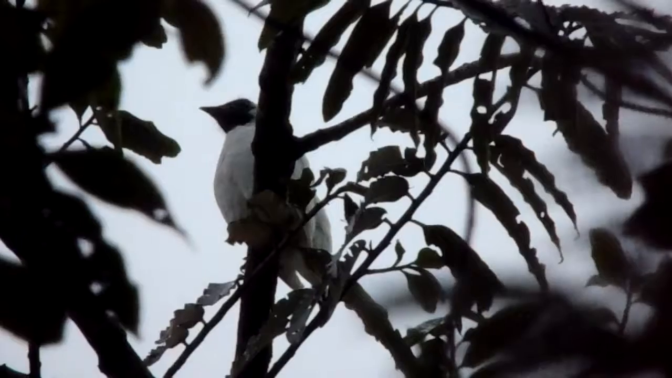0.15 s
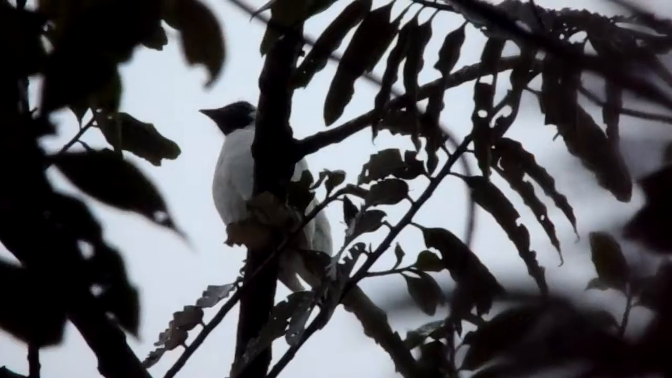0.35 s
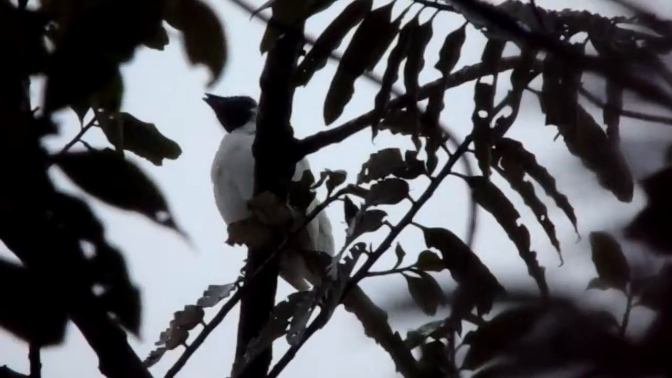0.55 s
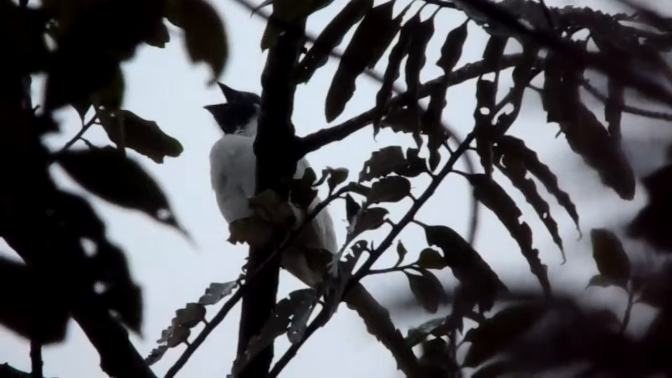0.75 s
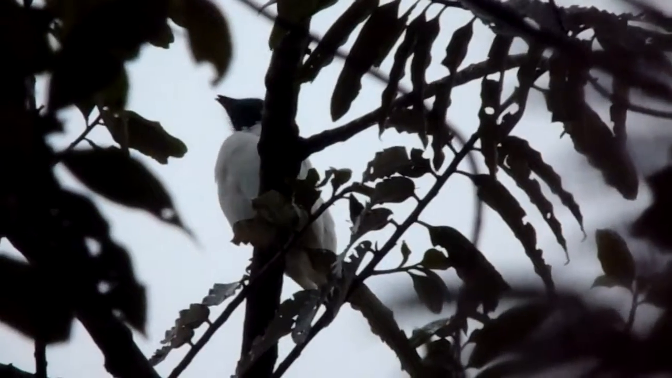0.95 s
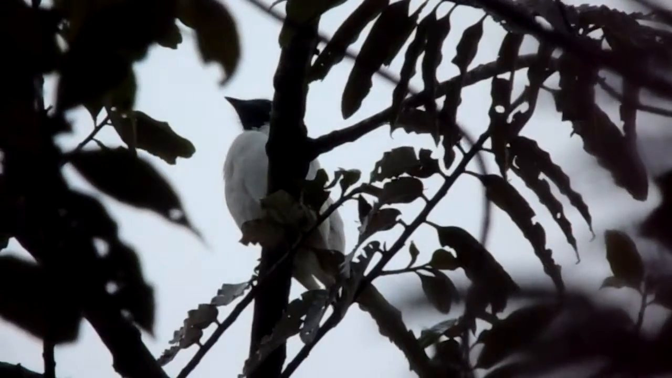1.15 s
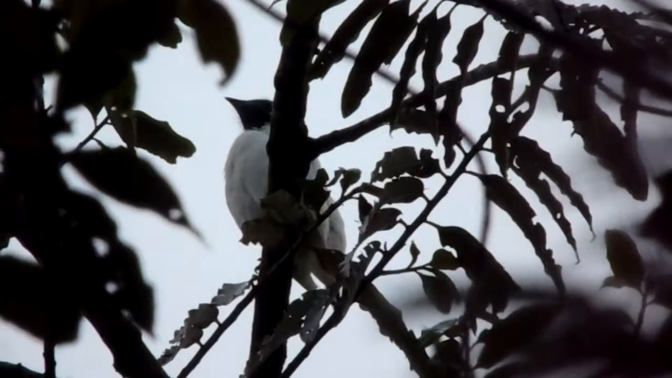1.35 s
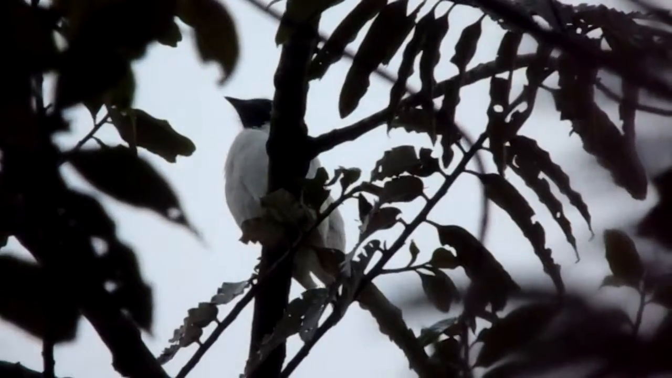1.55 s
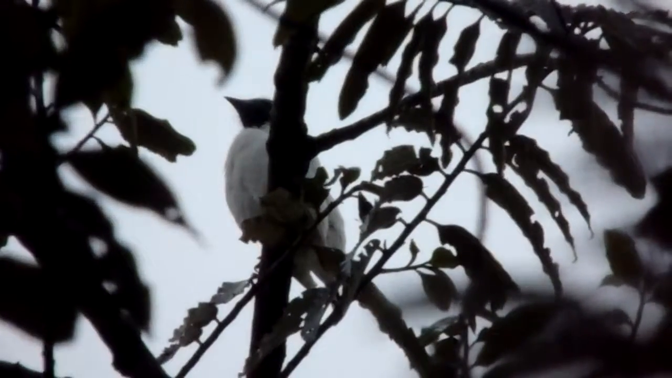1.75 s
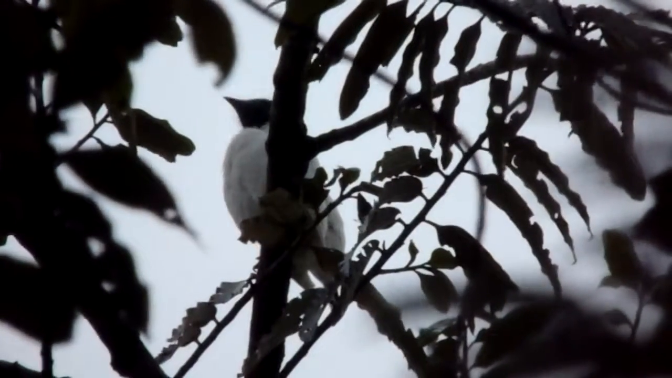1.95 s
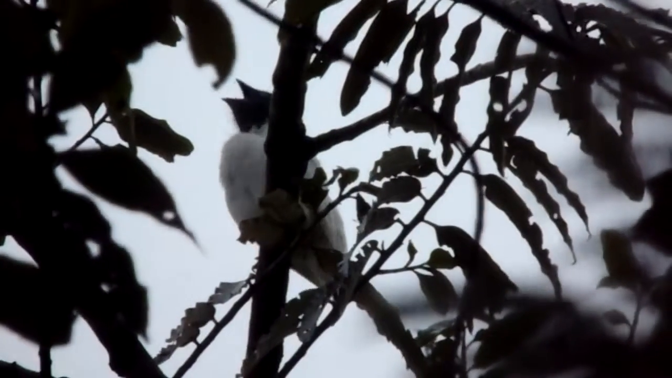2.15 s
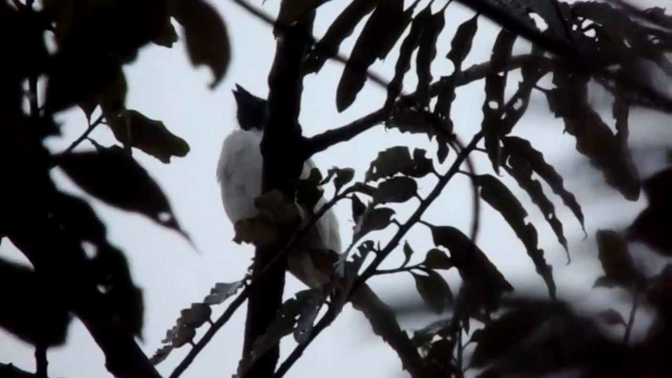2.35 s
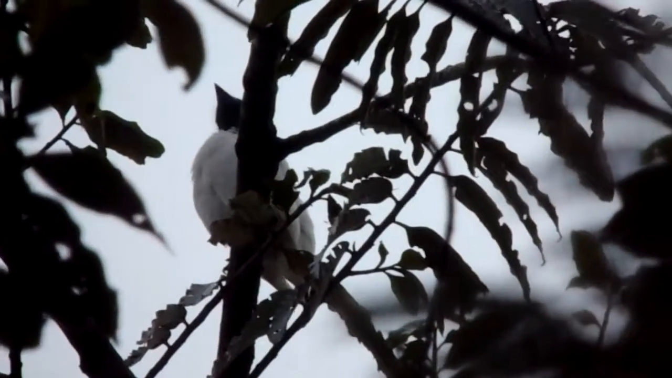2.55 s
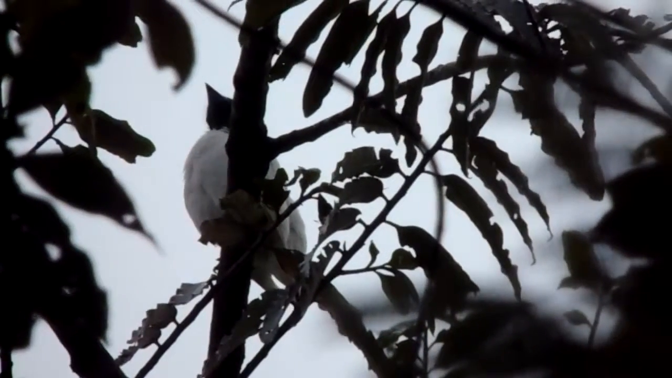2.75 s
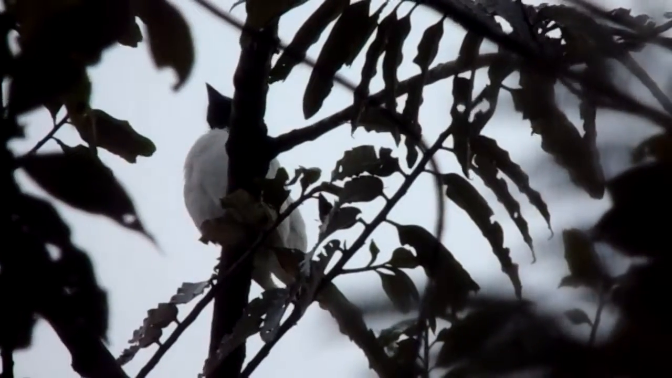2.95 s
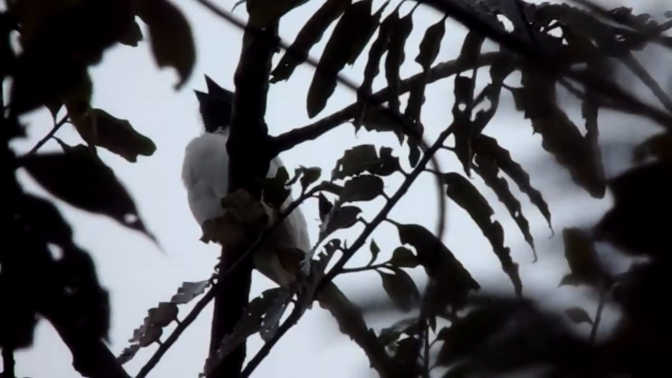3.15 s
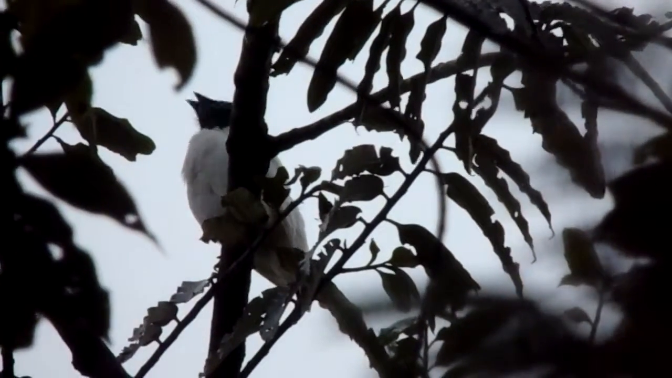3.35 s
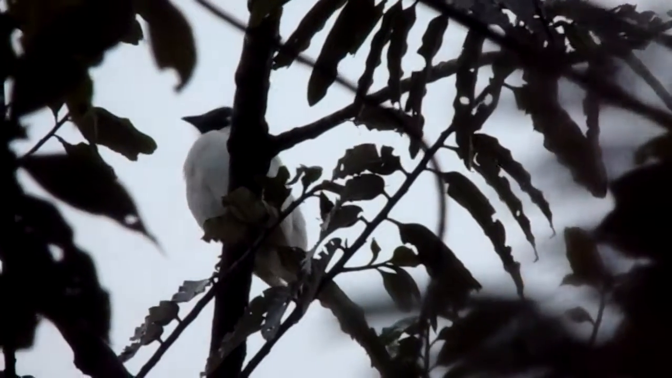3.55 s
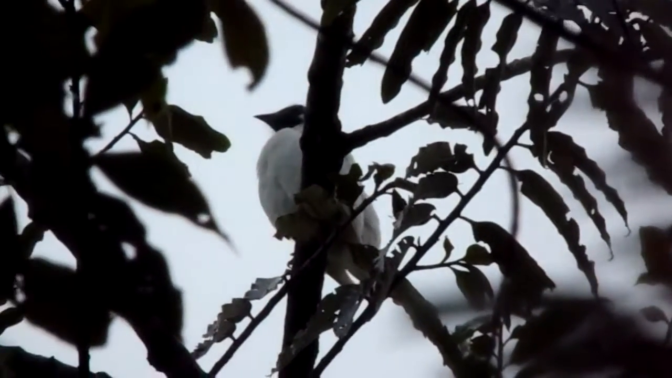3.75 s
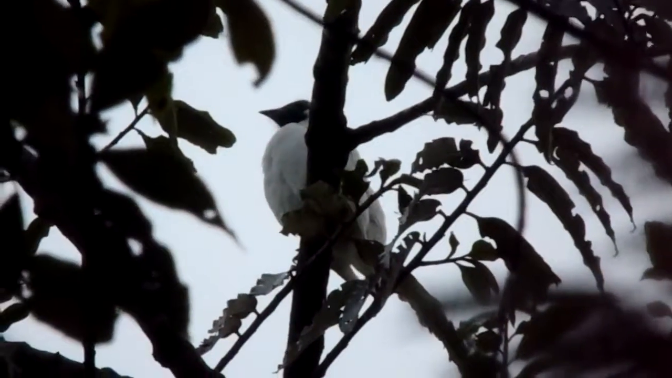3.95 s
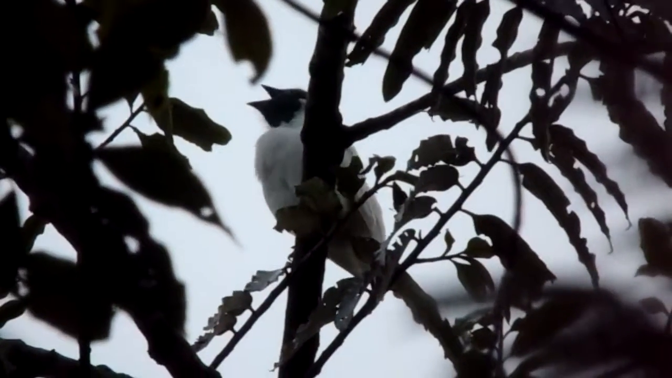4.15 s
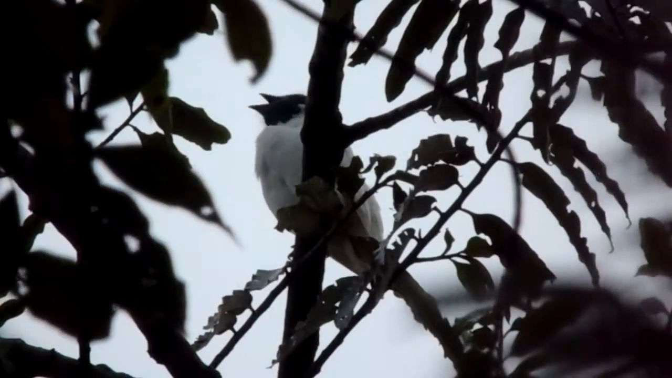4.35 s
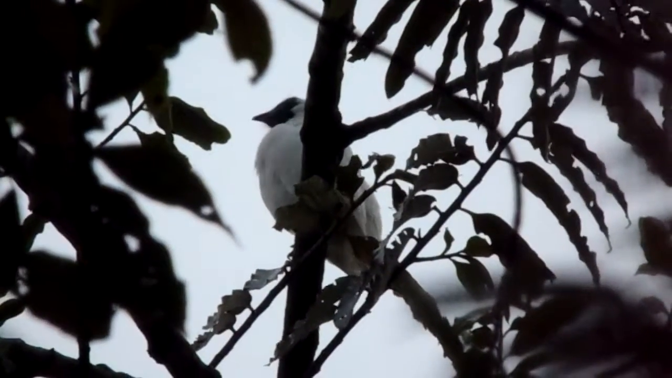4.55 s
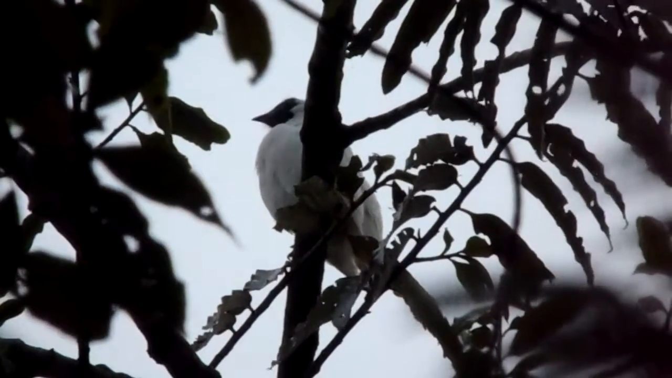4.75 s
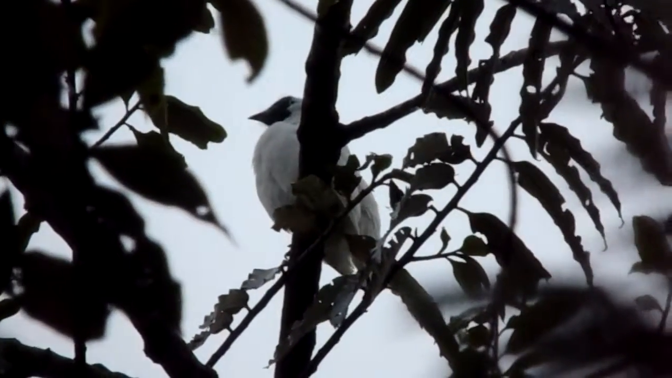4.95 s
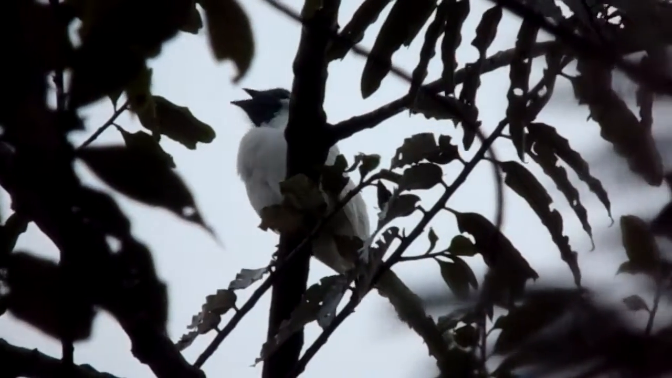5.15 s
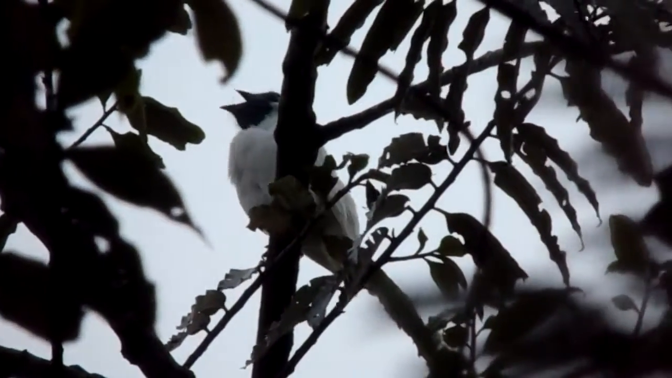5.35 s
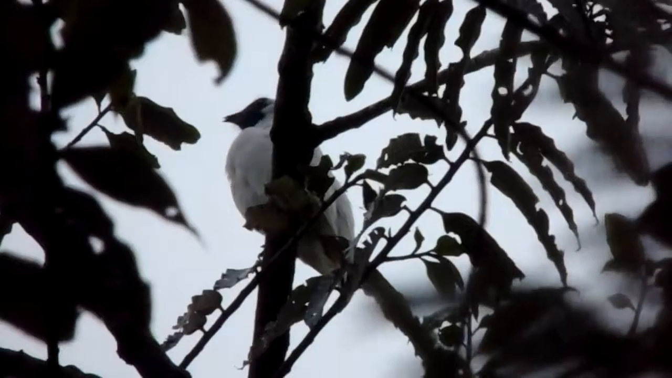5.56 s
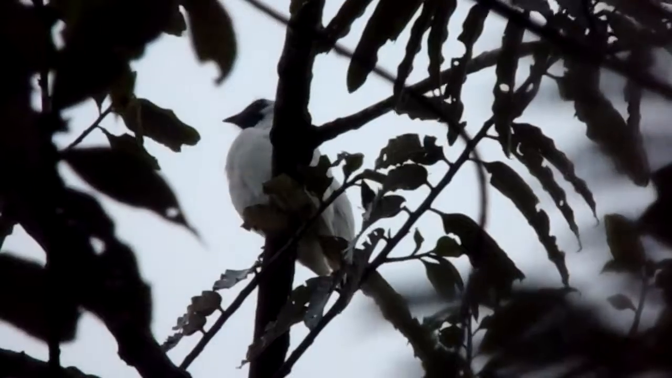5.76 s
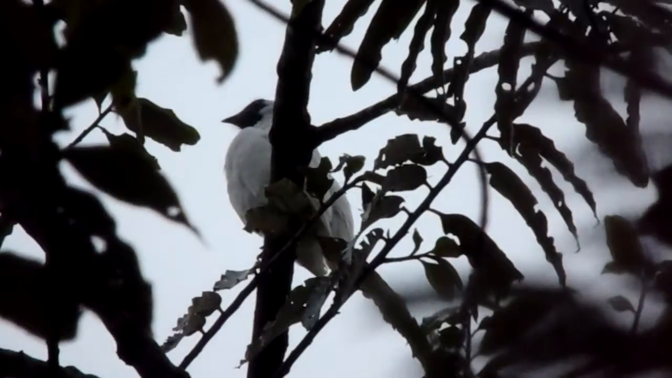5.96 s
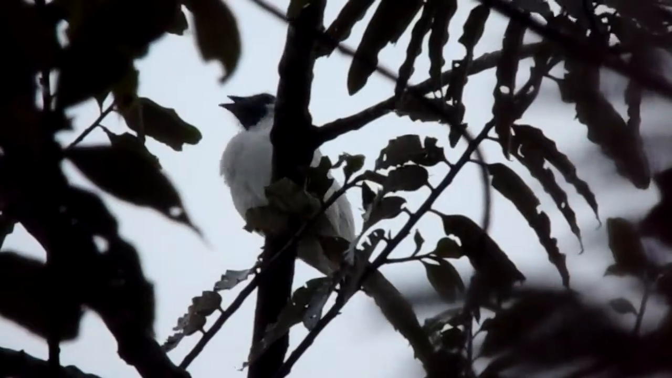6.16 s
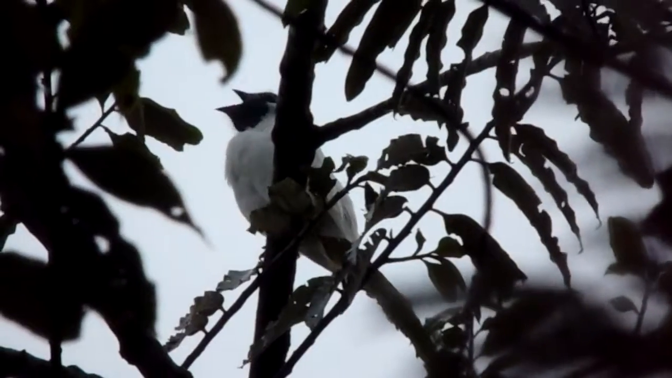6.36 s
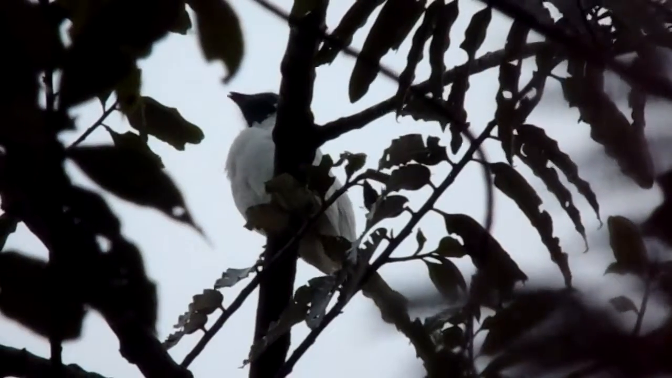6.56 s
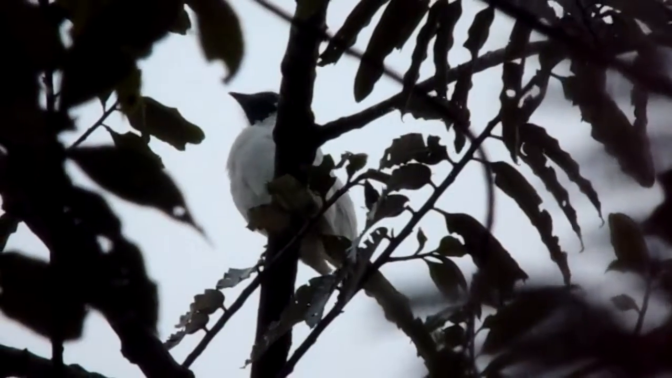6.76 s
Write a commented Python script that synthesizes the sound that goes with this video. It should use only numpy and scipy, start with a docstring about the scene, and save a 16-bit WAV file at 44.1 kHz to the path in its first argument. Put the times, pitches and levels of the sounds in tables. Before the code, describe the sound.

In a quiet, reverberant forest, a bellbird gives six short, piercing metallic clangs, the first much the loudest, after which they come about every second. Each throbs roughly for an instant, then leaves a thin high whistle and an echo from the trees. Very faint behind are insect hum, thin falling chirps, hoarse little scolds, a soft wing flutter and drops tapping leaves, one clicking close to the microphone.

```python
"""Bellbird in a forest

Six loud, throbbing clangs are modulated tones with a throat rasp; a thin whistle with harmonics follows each.
Small birds slur, glide and rasp as swept tones; wings flutter as pulsed noise.
Insects hum as trains of pips over filtered noise; drops tap as decaying noise and ringing modes.
A hush of filtered noise lies beneath; decaying noise responses give the echo of trunks and canopy."""
import sys
import numpy as np
from scipy import signal
from scipy.fft import rfft, irfft, next_fast_len
from scipy.io import wavfile
from scipy.ndimage import uniform_filter1d

SR = 44100
rng = np.random.default_rng(int(sys.argv[2]) if len(sys.argv) > 2 else 0)


def put_to_file(sound):
    """Save the sound as 16-bit audio at rate SR, in the file named by the first command-line argument."""
    columns = np.atleast_2d(sound).T  # one column per channel
    safe = np.clip(columns, -1, 1)
    whole_steps = np.round(safe * 32767)
    wavfile.write(sys.argv[1], SR, whole_steps.astype(np.int16))


N = 300321
T = np.arange(N) / SR  # time/s

# Spectrum of the forest hush: f/Hz, relative level/dB
HUSH_SPECTRUM = [(12, -32), (20, -1.5), (63, 0.5), (119, -2), (156, -3.5), (270, -3), (494, -5.5),
                 (766, -5), (1560, -10), (1740, -11), (4810, -18), (5990, -14), (7060, -16), (11900, -20.5),
                 (14000, -22.5)]
# Near insects: pip rate/Hz, f/Hz, level/dB
INSECTS = [(38.7, 5700, -68), (42.8, 6150, -69.5)]
# Spectrum of the far insect chorus: f/Hz, relative level/dB
CHORUS_SPECTRUM = [(4500, -37), (5300, -11.5), (5750, 1.5), (6000, -2), (6350, -2.5), (6700, -12.5),
                   (7500, -32.5)]
# Drops on leaves: t/s, level/dB
LEAF_TAPS = [(0.0834, -45.5), (0.5938, -41), (1.548, -35.5), (4.7989, -38.5)]
# Spectrum of a struck leaf: f/Hz, relative level/dB
LEAF_SPECTRUM = [(120, -20), (300, -2), (700, 6), (1500, 2.5), (2800, -2), (4500, -20.5), (9000, -19),
                 (14000, -26)]
# Modes of one drop striking close to the microphone: f/Hz, level/dB, t60/s
CLOSE_DROP_MODES = [(267, -36, 0.061), (538, -42.5, 0.063), (804, -35, 0.066), (930, -37.5, 0.047),
                    (1020, -37, 0.061), (1820, -31, 0.012), (2900, -30, 0.017), (5120, -26.5, 0.0095),
                    (10160, -34, 0.0064), (12100, -43, .007)]
CLOSE_DROP_S = 5.6062
# Thin, high slurs of a small bird: t/s, length/s, start f/Hz, level/dB
THIN_SLURS = [(0.321, 0.45, 10490, -56), (0.756, .49, 10520, -49), (1.12, .44, 10300, -67),
              (2.797, 0.5, 10560, -49.5), (2.903, .53, 10540, -53.5), (4.98, 0.36, 10320, -53.5),
              (5.159, 0.44, 10370, -53.5), (6.538, 0.4, 10450, -52)]
SLUR_FALL_HZ_PER_S = 2700
# Harsh calls of another bird: t/s, length/s, level/dB
SCOLDS = [(0.653, 0.23, -50), (2.026, 0.21, -50), (3.225, 0.2, -50.5), (4.386, 0.22, -50.5),
          (5.702, 0.2, -50), (6.772, 0.14, -53.5)]
# Spectrum of their hiss: f/Hz, relative level/dB
SCOLD_HISS_SPECTRUM = [(1800, -25), (3000, -5.5), (4300, -8), (5400, -4.5), (7600, -3.5), (9500, -15.5),
                       (12500, -10.5), (15000, -17.5)]
# Bellbird clangs: middle t/s, f/Hz, level/dB, half length/s, throb strength/dB,
# rasp level re the tone/dB, forest scatter level/dB
CLANGS = [(0.864, 1519, -13.5, 0.033, -1, -21.5, -21.5), (2.354, 1529, -22, .032, 1, -23.5, -20.5),
          (3.358, 1522, -21, .032, -1, -23, -22), (4.376, 1529, -22, .031, 1, -24, -20.5),
          (5.4074, 1526, -22.5, 0.033, -0.5, -24.5, -18.5), (6.432, 1527, -23, 0.031, 0, -24.5, -17)]
# Side tones made by the throb: offset from the pitch in multiples of the throb rate
SIDE_ORDERS = [-2, -1, 1, 2]
# Their levels before each clang's throb strength is added: level/dB
SIDE_LEVELS = [-26.5, -12, -14.5, -33]
# Resonances of throat and open bill: f/Hz, nominal width/Hz, relative level/dB
THROAT_RESONANCES = [(2733, 169, 3), (3103, 71, 6), (4186, 230, 1), (5050, 87, -14.5), (5410, 520, -14),
                     (6450, 290, -12), (7380, 770, -14)]
THROB_HZ, THROB_BEND_HZ = 78.57, 8.1  # the pitch dips at each throb
OCTAVE_DB, OCTAVE_FADE_S = -23, 0.04  # the octave sounds in the first throbs
FAR_ECHO_S, FAR_ECHO_DB = 0.245, -28.5  # one clear echo from the far trees
# Whistles after the clangs: loudest t/s, f/Hz, level/dB, first dip t/s, dip depth/dB
RINGS = [(0.958, 3150, -33, 0.995, 15), (2.464, 3166, -39.5, 2.535, 11), (3.456, 3150, -39, 3.493, 10),
         (4.488, 3160, -42, 4.53, 4.5), (5.528, 3163, -42.5, 5.615, 25), (6.541, 3157, -42, 6.61, 0)]
RING_RISE_DB_PER_S, RING_FADE_DB_PER_S = 270, 72
# This long after its peak the whistle is let go: the release rate adds to the fade
RING_HOLD_S, RING_RELEASE_DB_PER_S = 0.22, 138.5
DIP_EVERY_S, DIP_WIDTH_S = 0.145, 0.021
# Bursts of wingbeats: t/s, length/s, level/dB
FLUTTERS = [(1.681, 0.17, -55.5), (1.912, .41, -57), (2.322, 0.071, -51.5)]
# Spectrum of a wingbeat: f/Hz, relative level/dB
WINGBEAT_SPECTRUM = [(150, -21), (330, -15), (420, 4), (500, -12), (580, -0.5), (646, 4), (700, -18),
                     (775, 6.5), (900, -20), (1250, -4.5), (1800, -21), (2270, -12.5), (4000, -35)]
WING_HZ = 29.87
# Gliding whistles of a farther songbird: t/s, length/s, start f/Hz, end f/Hz, level/dB
GLIDES = [(2.857, 0.13, 3530, 2460, -58.5), (2.97, 0.21, 2605, 2610, -59.5), (3.392, .22, 2975, 1955, -57),
          (3.593, .2, 2760, 2670, -62.5), (3.886, 0.11, 4030, 2460, -61), (3.987, .26, 2790, 2890, -63.5),
          (4.158, .14, 2590, 1960, -55.5), (4.258, 0.068, 7100, 7240, -57.5),
          (4.611, .19, 2970, 2370, -60.5), (4.828, 0.32, 2850, 2970, -65.5),
          (5.925, 0.15, 2910, 2940, -67.5)]
TOP_HZ = 14150  # upper edge of the passband


def undb(db):
    """Level law: convert decibels to an amplitude ratio."""
    return 10 ** (np.asarray(db) / 20)


def unit(x):
    """Normalization: scale a signal to an rms value of 1."""
    return x / np.sqrt(np.mean(x ** 2))


def shape(x, gain):
    """Linear filtering: multiply the spectrum by a gain given as a function of frequency."""
    size = next_fast_len(N + SR // 4)
    hz = np.arange(size // 2 + 1) * SR / size + 1e-6  # the offset avoids log(0) and division by 0
    return irfft(rfft(x, size) * gain(hz), size)[:N]


def noise(points):
    """Spectral shaping: white noise takes a colour interpolated over log frequency, at rms 1."""
    hz, db = np.transpose(points)

    def gain(f):
        """Interpolation: read the gain between the listed frequencies."""
        return undb(np.interp(np.log(f), np.log(hz), db))

    return unit(shape(rng.standard_normal(N), gain))


def walk(rate):
    """Random modulation: smoothed random steps at the given rate/Hz wander with rms near 1."""
    step = max(int(SR / rate), 1)
    held = np.repeat(rng.standard_normal(N // step + 1), step)
    return unit(uniform_filter1d(held, step)[:N])


def phase(hz):
    """Frequency modulation: phase is the running integral of frequency."""
    return 2 * np.pi * np.cumsum(hz) / SR


def arch(u, power):
    """Amplitude envelope: a parabola raised to a power swells and fades as u goes from 0 to 1."""
    u = np.clip(u, 0, 1)
    return (4 * u * (1 - u)) ** power


def forest(x, wet_db, t60, echo_db=-16.5, echo_s=0.243, rise_s=0.0015):
    """Multiple scattering: decaying noise stands for trunks and leaves, a late bunch for the far trees."""
    t = T[:SR * 3 // 2]
    scatter = undb(-60 * t / t60) * (1 - np.exp(-t / rise_s))
    late = undb(echo_db) * np.exp(-((t - echo_s) / 0.022) ** 2)
    response = rng.standard_normal(len(t)) * (scatter + late)
    response = response / np.linalg.norm(response)
    return x + undb(wet_db) * signal.fftconvolve(x, response)[:N]


def air(level_db=-55.5, swell_db=0.84):
    """Broadband ambience: coloured noise with a slow, slight swell is the even hush of the forest."""
    return noise(HUSH_SPECTRUM) * undb(level_db + swell_db * walk(1.8))


def insects(sweep=0.19, pip_share=0.45, chorus_db=-68.0):
    """Pulse-train modulation: tiny falling pips swell irregularly over a far chorus that blurs to a hum."""
    near_insects = np.zeros(N)
    for rate, hz, db in INSECTS:
        cycle = np.cumsum(rate * (1 + 0.07 * walk(12))) / SR % 1
        u = cycle / pip_share  # each pip fills only this share of its cycle
        pitch = hz * (1 + 0.015 * walk(14) - sweep * (u - 0.5))
        bouts = np.clip(0.7 + 0.35 * walk(10), 0, 1.3)
        near_insects += undb(db) * unit(arch(u, 1.7) * bouts * np.sin(phase(pitch)))
    chorus = noise(CHORUS_SPECTRUM) * undb(chorus_db + 0.78 * walk(14))
    return forest(near_insects, wet_db=-3.0, t60=0.56) + chorus


def drops(tap_t60=0.013, crack_db=-24.5, crack_s=0.0013, low_hz=207.5):
    """Impact excitation: leaves give short noise taps; one close hit cracks and rings decaying modes."""
    strikes = sum(undb(db - 60 * np.abs(T - s) / tap_t60) * (T > s) for s, db in LEAF_TAPS)
    taps = strikes * noise(LEAF_SPECTRUM)
    t = np.maximum(T - CLOSE_DROP_S, 0)
    ring = np.zeros(N)
    for k, (hz, db, t60) in enumerate(CLOSE_DROP_MODES):
        sign = (-1) ** k  # neighbouring modes start in opposite directions
        ring += sign * undb(db - 60 * t / t60) * np.sin(2 * np.pi * hz * t)
    burst = np.exp(-((T - CLOSE_DROP_S - 0.0008) / crack_s) ** 2)
    crack = undb(crack_db) * burst * rng.standard_normal(N)
    # small sources radiate little bass
    high_pass = signal.butter(2, low_hz, "high", fs=SR, output="sos")
    hits = signal.sosfilt(high_pass, taps + ring + crack)
    return forest(hits, wet_db=-20.5, t60=0.3, echo_db=-42.5)


def slurs(shiver=0.0055, flicker_db=2.0):
    """Linear frequency sweep: a thin voice falls steadily, shivering in pitch; leaves scatter much of it."""
    out = np.zeros(N)
    bend = 1 + shiver * walk(500)
    flicker = undb(flicker_db * walk(35))
    for s, length, start_hz, db in THIN_SLURS:
        near = (T > s) & (T < s + length)
        t = T[near] - s
        hz = (start_hz - SLUR_FALL_HZ_PER_S * t) * bend[near]
        out[near] += undb(db) * arch(t / length, 1.2) * flicker[near] * np.sin(phase(hz))
    return forest(out, wet_db=-1.5, t60=0.48, echo_db=-35.0)


def scolds(start_hz=3478.0, top_hz=4430.0, rasp_hz=135.6, scatter_hz=270.0, hiss_db=-9.5):
    """Amplitude and random frequency modulation: a hoarse, rattling note rises fast to a jittery plateau."""
    out = np.zeros(N)
    jitter = scatter_hz * walk(2000)
    hiss = undb(hiss_db) * noise(SCOLD_HISS_SPECTRUM)
    rattle = 1 + 0.5 * np.sin(phase(rasp_hz * (1 + 0.15 * walk(60))))
    for s, length, db in SCOLDS:
        near = (T > s) & (T < s + length)
        t = T[near] - s
        hz = top_hz + (start_hz - top_hz) * np.exp(-t / 0.031) + jitter[near]
        voice = np.sin(phase(hz)) + hiss[near]
        out[near] += undb(db) * arch(t / length, 0.83) * rattle[near] * voice
    return forest(out, wet_db=2.0, t60=0.75, echo_db=-25.0)


def throat(kicks, grit, smear_s=0.0015, gain_db=9.5):
    """Source-filter principle: brief scrapes and grit excite resonances of the throat and open bill."""
    scrape = rng.standard_normal(SR // 50) * np.exp(-T[:SR // 50] / smear_s)
    scrape = scrape / np.linalg.norm(scrape)
    drive = grit + signal.fftconvolve(kicks, scrape)[:N]

    def gain(f):
        """Resonance: sum the squared second-order responses."""
        total = 0
        for hz, width, db in THROAT_RESONANCES:
            detuning = (f / hz - hz / f) * hz / (1.36 * width)
            total = total + undb(db) / (1 + 1j * detuning) ** 2
        return total

    return undb(gain_db) * shape(drive, gain)


def clangs(sag_hz=5.75, waver_hz=7.7, edge=3.2, linger_db=-17.5, linger_s=0.028,
           scatter_throb_db=6.5, rasp_wet_db=-1.0):
    """Modulation sidebands: a tone throbs about five times and lingers; each throb kicks the throat."""
    out, kicks, grit = np.zeros((3, N))
    hiss = rng.standard_normal(N)
    waver = waver_hz * walk(120)
    for s, hz, db, half, throb_db, rasp_db, wet_db in CLANGS:
        near = np.abs(T - s) < 0.1
        t = T[near] - s
        throb = 2 * np.pi * THROB_HZ * t
        sag = sag_hz * np.minimum(t / half, 1)
        turn = phase(hz - sag - THROB_BEND_HZ * np.cos(throb) + waver[near])

        attack = np.clip((t + half + 0.0013) / 0.0028, 0, 1)
        effort = undb(db) * np.exp(-np.abs(t / half) ** edge) * attack
        linger = undb(db + linger_db) * np.exp(-np.abs(t - half) / linger_s) * (t > 0)
        swell = np.sqrt(2) * np.maximum(effort, linger)

        core, sides = np.zeros((2, N))
        core[near] = swell * np.sin(turn)
        side_tones = sum(undb(side_db + throb_db) * np.sin(turn + k * throb)
                         for k, side_db in zip(SIDE_ORDERS, SIDE_LEVELS))
        sides[near] = swell * side_tones
        octave_fade = np.exp(-(t + half) / OCTAVE_FADE_S)
        octave = effort * octave_fade * (1 + np.cos(throb)) * np.sin(2 * turn)
        out[near] += undb(OCTAVE_DB) * octave

        # the forest returns a rougher sound than the direct path; each clang draws its own scatter
        sent = core + undb(scatter_throb_db) * sides
        scattered = forest(sent, wet_db, t60=1.18, echo_db=-22.5, echo_s=FAR_ECHO_S) - sent
        out += core + sides + scattered
        out += undb(FAR_ECHO_DB) * np.interp(T - FAR_ECHO_S, T, core)

        cycle = np.floor(THROB_HZ * t + 0.33)
        impulses = unit(np.diff(cycle, prepend=cycle[0]))
        kicks[near] += undb(rasp_db) * effort * impulses
        grit[near] += undb(rasp_db) * effort * hiss[near] * (1 + np.cos(throb))
    return out + forest(throat(kicks, grit), rasp_wet_db, t60=0.81, echo_db=-27.0)


def rings(second_db=-11.5, third_db=-29.0, waver_hz=5.3, bright_s=0.046):
    """Harmonic synthesis: a whistle swells, is brightest at its peak, then fades with up to two dips."""
    out = np.zeros(N)
    waver = waver_hz * walk(25)
    for s, hz, db, dip_s, dip_db in RINGS:
        near = (T > s - 0.12) & (T < s + 0.4)
        t = T[near] - s
        rise = RING_RISE_DB_PER_S * np.maximum(-t, 0)
        fade = RING_FADE_DB_PER_S * np.maximum(t, 0)
        release = RING_RELEASE_DB_PER_S * np.maximum(t - RING_HOLD_S, 0)
        dips = dip_db * sum(np.exp(-((T[near] - at) / DIP_WIDTH_S) ** 2)
                            for at in (dip_s, dip_s + DIP_EVERY_S))
        level = undb(db - rise - fade - release - dips)
        turn = phase(hz + waver[near])
        bright = np.exp(-(t / bright_s) ** 2)
        overtones = undb(second_db) * np.sin(2 * turn) + undb(third_db) * np.sin(3 * turn)
        out[near] += np.sqrt(2) * level * (np.sin(turn) + bright * overtones)
    return forest(out, wet_db=-17.5, t60=0.9)


def wings(sharpness=1.4):
    """Periodic flow noise: each wingbeat pushes out a soft puff of air."""
    push = np.zeros(N)
    for s, length, db in FLUTTERS:
        near = (T > s) & (T < s + length)
        u = (T[near] - s) * WING_HZ % 1
        push[near] += undb(db) * unit(arch(np.sqrt(u), 1.2) ** sharpness)
    return forest(push * noise(WINGBEAT_SPECTRUM), wet_db=-6, t60=0.2)


def glides(quaver=0.0029, flicker_db=3.0):
    """Frequency glide: soft whistles move linearly from one pitch to another, with a slight quaver."""
    out = np.zeros(N)
    bend = 1 + quaver * walk(150)
    flicker = undb(flicker_db * walk(35))
    for s, length, start_hz, end_hz, db in GLIDES:
        near = (T > s) & (T < s + length)
        u = (T[near] - s) / length
        hz = (start_hz + (end_hz - start_hz) * u) * bend[near]
        out[near] += undb(db) * arch(u, 0.32) * flicker[near] * np.sin(phase(hz))
    return forest(out, wet_db=-4.0, t60=0.96, echo_db=-23.0)


def scene():
    """Superposition: the pressures of all sources add at one microphone."""
    background = air() + insects() + drops()
    birds = slurs() + scolds() + clangs() + rings() + wings() + glides()
    return (background + birds)[None]


def record(dry):
    """Band limitation: a steep elliptic low-pass removes the top of the spectrum."""
    low_pass = signal.ellip(10, 0.2, 80, TOP_HZ, fs=SR, output="sos")
    return signal.sosfilt(low_pass, dry)


dry = scene()
out = record(dry)
put_to_file(out)
```